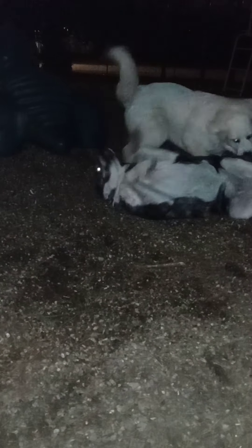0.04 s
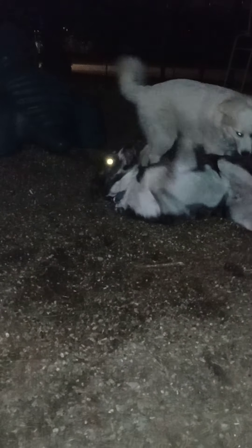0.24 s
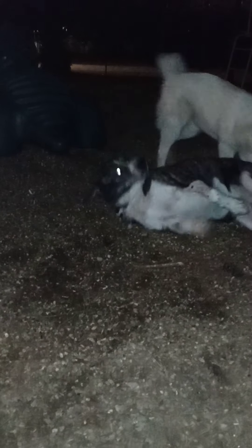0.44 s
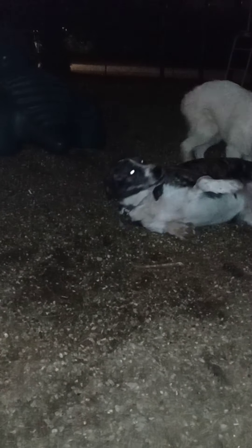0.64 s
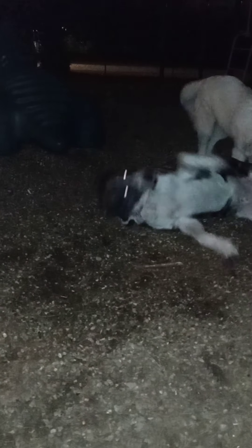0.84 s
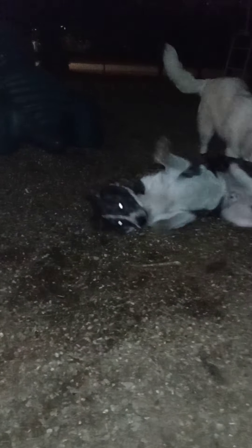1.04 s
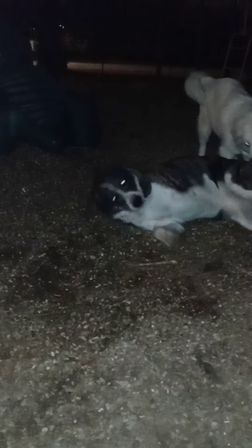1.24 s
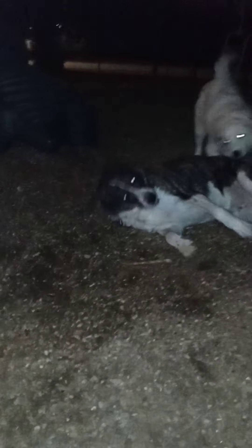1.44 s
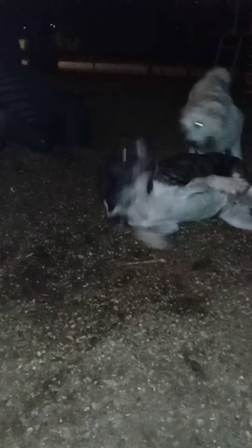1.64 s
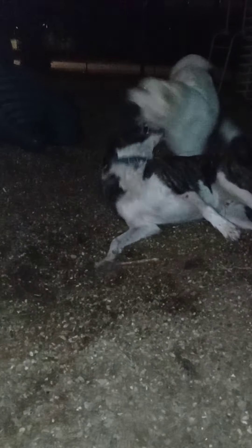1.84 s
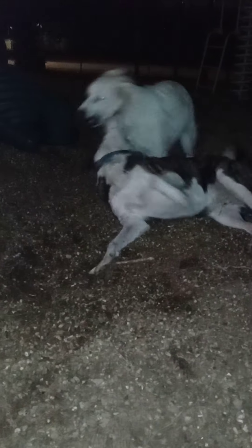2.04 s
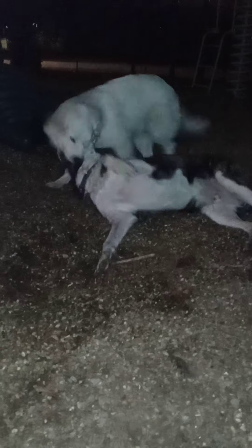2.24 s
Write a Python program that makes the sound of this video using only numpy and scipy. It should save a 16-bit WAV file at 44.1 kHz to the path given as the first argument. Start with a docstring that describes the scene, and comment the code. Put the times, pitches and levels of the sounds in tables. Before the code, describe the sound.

Gritty gravel scuffling from rolling dogs, heard outdoors at a short distance with little echo: bursts of scraping, one weighty body thump, light collar jingles, then a thin whistle from the nose and short rough huffs.

```python
"""Paws and backs scrape through loose gravel as two dogs wrestle in a yard at night: noise cut into tiny grains.
Bodies land with dull thuds of low noise, and metal on a collar clinks as a cluster of fading tones.
Near the end one dog gives short raspy huffs, made of chopped air ringing in its throat,
and a thin nose whistle, a wavering tone. A low rumble of filtered noise lies under it all."""
import sys
import numpy as np
from scipy import signal
from scipy.fft import rfft, irfft
from scipy.io import wavfile
from scipy.ndimage import uniform_filter1d

SR = 44100
rng = np.random.default_rng(int(sys.argv[2]) if len(sys.argv) > 2 else 0)


def wav_out(sig):
    """Save sig, one row per channel (or a flat mono array), as 16-bit PCM at SR to the path in sys.argv[1]."""
    wavfile.write(sys.argv[1], SR, np.round(np.clip(np.atleast_2d(sig).T, -1, 1) * 32767).astype(np.int16))


N = 99225
TIME = np.arange(N) / SR  # seconds

# Bright colour of fine grit, also used for the tick of a clink.
# Each row: frequency in Hz, relative level in dB.
FINE_COLOUR = [(1500, -50), (4000, -39), (6500, -1.5), (7400, -5.5), (8500, 3.5), (10000, -4.5),
               (11600, -18.5), (13000, -7.5), (16000, -16)]


def from_db(db):
    """Turn decibels into gain."""
    return 10 ** (np.asarray(db) / 20)


def rms_one(x):
    """Scale to an average strength (rms) of 1."""
    return x / np.sqrt(np.mean(x ** 2) + 1e-20)


def noise():
    """White noise with rms 1."""
    return rng.standard_normal(N)


def drift(rate_hz):
    """Smooth random wandering with rms 1; a higher rate wanders faster."""
    r = np.exp(-2 * np.pi * rate_hz / SR)
    wander = signal.lfilter([1], [1, -2 * r, r * r], rng.standard_normal(N + SR))
    return rms_one(wander[SR:])  # skip the filter's first second


def colour(x, points):
    """Filter that shapes the spectrum without ringing ahead; white noise keeps its level."""
    hz, db = np.transpose(points)
    size = 4096
    grid_hz = np.maximum(np.arange(size // 2 + 1) * SR / size, 1)
    gains = rms_one(from_db(np.interp(np.log(grid_hz), np.log(hz), db)))
    # folding the cepstrum moves the filter's energy to its start (minimum phase)
    cepstrum = irfft(np.log(gains))
    cepstrum[1:size // 2] *= 2
    cepstrum[size // 2 + 1:] = 0
    return signal.fftconvolve(x, irfft(np.exp(rfft(cepstrum))))[:N]


def swell(peak_s, rise_s, fall_s):
    """Envelope that climbs 20 dB in rise_s and drops 20 dB in fall_s."""
    before, after = (peak_s - TIME) / abs(rise_s), (TIME - peak_s) / abs(fall_s)
    return 10 ** -np.minimum(np.maximum(before, after), 10)


def rumble():
    """Distant low noise that surges a little, with faint air above it."""
    # Colour of the rumble and air. Each row: frequency in Hz, relative level in dB.
    rumble_colour = [(20, -44), (32, -17), (45, -23), (62, -4.5), (82, 2), (120, 0.5), (170, -3),
                     (230, -8.5), (310, -20), (420, -35), (700, -37), (2000, -46.5), (16000, -42)]
    level_db, surge_db, surge_hz, low_cut_hz = -49, 1.24, 6.8, 37
    low_cut = signal.butter(3, low_cut_hz, "high", fs=SR, output="sos")
    steady = signal.sosfilt(low_cut, colour(noise(), rumble_colour))
    return from_db(level_db + surge_db * drift(surge_hz)) * steady


def yard(x):
    """Short, faint scatter from the ground and the fence: a burst of fading noise as the echo."""
    echo_db, t60_s = -17.5, 0.11  # t60: time to fade by 60 dB
    t = TIME[:SR // 2]
    tail = rng.standard_normal(len(t)) * from_db(-60 * t / t60_s) * (t > 0.005)
    return from_db(echo_db) * signal.fftconvolve(x, tail / np.linalg.norm(tail))[:N]


def whistle():
    """A faint nose tone that wavers and mostly sinks in pitch, with a weak overtone."""
    # Path of the whistle. Each row: time in seconds, pitch in Hz, level in dB.
    path = [(1.7, 2984, -73), (1.766, 2943, -58), (1.805, 3006, -73), (1.835, 2990, -55.5),
            (1.879, 2983, -52.5), (1.894, 2840, -54), (1.94, 2780, -59), (1.995, 2580, -64),
            (2.03, 2530, -50), (2.06, 2460, -75)]
    waver_hz, overtone_db = 18.1, -18
    s, hz, db = np.transpose(path)
    pitch_hz = np.interp(TIME, s, hz) + waver_hz * drift(103)
    phase = 2 * np.pi * np.cumsum(pitch_hz) / SR
    tone = np.sin(phase) + from_db(overtone_db) * np.sin(4 * phase)  # fourth harmonic
    sounding = (TIME > s[0]) * (TIME < s[-1])
    return from_db(np.interp(TIME, s, db)) * sounding * np.sqrt(2) * tone


def throat(x, hz, width_hz):
    """Narrow resonance whose centre follows hz: shift down to zero, low-pass, shift back up."""
    turn = np.exp(2j * np.pi * np.cumsum(hz) / SR)
    low_pass = signal.butter(2, width_hz / 2, fs=SR, output="sos")
    return (signal.sosfilt(low_pass, x / turn) * turn).real


def huffs():
    """Slow, uneven flaps of the throat chop the air, which rings in the throat and hisses through the mouth."""
    # Each row: peak in seconds, rise and fall in seconds per 20 dB, level in dB, throat pitch in Hz,
    # throat width in Hz, throat glide in octaves per second, mouth hiss in dB against the throat.
    breaths = [(1.62, 0.12, 0.17, -57.5, 1710, 300, 7, 4.5), (1.745, 0.034, 0.12, -50, 1430, 199, 7.5, -8),
               (1.765, 0.1, 0.03, -48.5, 1870, 397, 4.5, -7), (1.789, 0.015, .015, -50, 2180, 80, 13.5, -9),
               (1.76, 0.055, 0.079, -60.5, 890, 150, -3.5, -16),
               (1.85, 0.064, 0.13, -56.5, 1190, 400, 2, 4.5),
               (1.928, 0.0049, 0.02, -42, 936, 60, -4.5, -21), (1.963, .025, 0.027, -42, 835, 198, 7, 5),
               (1.974, 0.023, 0.019, -35, 849, 89, -2.5, -17),
               (1.985, 0.0049, 0.012, -29.5, 900, 70, 2, -24),
               (2.04, 0.057, 0.052, -55.5, 862, 199, 2, 3.5),
               (2.08, 0.028, 0.046, -47.5, 860, 197, 1.5, -1),
               (2.149, 0.011, 0.043, -44, 960, 90, -0.5, -2), (2.17, 0.0098, 0.037, -41, 1220, 247, 1, -20),
               (2.182, 0.021, .03, -37, 941, 90, -2.5, -32), (2.2, 0.013, 0.02, -45.5, 982, 120, 4, -15)]
    # Colour of the mouth hiss. Each row: frequency in Hz, relative level in dB.
    mouth_colour = [(500, -32), (700, -15), (1200, -14), (1700, -9), (2100, -0.5), (2350, -8), (2700, 0),
                    (3300, -18), (5000, -12), (9000, -35), (16000, -62)]
    flutter_hz, flutter_jitter, flutter_depth = 85.36, 0.17, 0.35
    pulse_share = 0.18  # power share of sharp flaps; the rest is chopped noise
    cycles = np.cumsum(flutter_hz * np.exp(flutter_jitter * drift(40.35))) / SR
    gate = rms_one(1 + flutter_depth * np.cos(2 * np.pi * cycles))
    flaps = rms_one(np.diff(np.floor(cycles), prepend=0))  # one click per cycle
    air = np.sqrt(pulse_share) * flaps + np.sqrt(1 - pulse_share) * gate * noise()
    hiss = colour(gate * noise(), mouth_colour)
    out = np.zeros(N)
    for s, rise, fall, db, throat_hz, width_hz, glide, hiss_db in breaths:
        gliding_hz = throat_hz * 2 ** np.clip(glide * (TIME - s), -1, 1)
        voice = throat(air, gliding_hz, width_hz)
        # even out the strength over about 16 ms
        voice = voice / np.sqrt(uniform_filter1d(voice ** 2, size=700) + 1e-12)
        out += from_db(db) * swell(s, rise, fall) * (voice + from_db(hiss_db) * hiss)
    return out


def collar(count=3):
    """Each clink is a quick chatter of touches; fur damps the metal by a different amount each time."""
    # Each row: start in seconds, level in dB before the trim below, time to fade by 60 dB in seconds,
    # pitch in Hz around which the metal rings most readily.
    clinks = [(1.0097, -23.5, 0.019, 9100), (1.032, -24, 0.02, 8500), (1.0829, -26, 0.016, 8650),
              (1.336, -32.5, 0.042, 10200), (1.348, -28, 0.13, 7360), (1.3659, -27, .04, 7500),
              (1.388, -30, .02, 7850), (1.403, -40, 0.027, 11000), (1.4169, -27.5, 0.046, 8700),
              (1.4314, -14.5, 0.016, 7200), (1.4484, -19.5, 0.018, 7100), (1.466, -29.5, 0.033, 8500),
              (1.472, -27, .02, 7360), (1.477, -23.5, 0.018, 7600), (1.514, -25, 0.029, 9600),
              (1.6665, -15.5, 0.016, 7540), (1.68, -23, 0.018, 8100), (1.746, -37, 0.023, 8050)]
    # Tones the metal can ring with. Each row: frequency in Hz, relative level in dB.
    metal_tones = [(7240, -7), (7320, 0.5), (7780, -16), (8300, -5), (8850, -10), (9400, -3), (10000, 0.5),
                   (11500, -5), (12150, -10), (15720, 12)]
    width_octaves, trim_db, tick_db, low_cut_hz = 0.16, -1, -14.5, 4800
    chatter_s, chatter_loss_db = 0.0015, 7  # longest-typical gap, and loss from touch to touch
    hz, tone_db = np.transpose(metal_tones)
    out, t = np.zeros(N + SR), np.arange(SR // 10) / SR
    for s, db, t60, centre_hz in clinks:
        octaves_away = np.log2(hz / centre_hz)
        weights = from_db(tone_db) / (1 + (octaves_away / width_octaves) ** 2)
        weights = weights / np.linalg.norm(weights)
        for k in range(count):
            start = int((s + k * chatter_s * (1 + rng.uniform(-0.29, 0.067))) * SR)
            strengths = weights * from_db(rng.normal(0, 2.3, len(hz))) * rng.choice([-1, 1], len(hz))
            rings = strengths @ np.sin(2 * np.pi * hz[:, None] * t) * from_db(-60 * t / t60)
            out[start:start + len(t)] += from_db(db + trim_db - k * chatter_loss_db) * rings
    ticks = sum(from_db(db + tick_db) * swell(s, 1 / SR, 0.004) for s, db, _, _ in clinks)
    low_cut = signal.butter(4, low_cut_hz, "high", fs=SR, output="sos")
    return signal.sosfilt(low_cut, out[:N] + colour(noise() * ticks, FINE_COLOUR))


def thuds():
    """Bodies and paws land: bursts of low noise make dull knocks and the soft weight of a rolling body."""
    # Each row of knocks and rolls: peak in seconds, rise and fall in seconds per 20 dB, level in dB.
    knocks = [(.03, 0.14, 0.26, -64.5), (.222, 0.0044, 0.024, -54), (.33, 0.033, 0.037, -58),
              (0.419, 0.044, 0.045, -46.5), (.55, 0.055, 0.053, -51), (.78, 0.047, 0.038, -53.5),
              (0.899, 0.046, .1, -40.5), (0.922, 0.0011, 0.0093, -23.5), (.99, 0.027, 0.021, -56.5)]
    rolls = [(.555, 0.1, 0.17, -53), (0.93, 0.0047, 0.023, -40.5), (2.19, 0.056, 0.035, -56)]
    # Colours of a knock and of a roll. Each row: frequency in Hz, relative level in dB.
    knock_colour = [(150, -25), (300, -13), (500, -15), (680, -12), (900, 3.5), (1150, -3), (1500, 0.5),
                    (2500, -5.5), (5000, -54)]
    roll_colour = [(120, -55), (250, 2.5), (420, -1.5), (550, -6), (700, -7), (1200, -12)]
    knock_level = sum(from_db(db) * swell(s, rise, fall) for s, rise, fall, db in knocks)
    roll_level = sum(from_db(db) * swell(s, rise, fall) for s, rise, fall, db in rolls)
    return colour(noise() * knock_level, knock_colour) + colour(noise() * roll_level, roll_colour)


def contacts():
    """Power of a random stream of short stone contacts, each fading quickly; mean 1."""
    grains_per_s, spread_db, fade_s = 1900, 1, 0.00049
    sizes = from_db(spread_db * np.minimum(rng.exponential(1, N), 5))
    touches = sizes * (rng.random(N) < grains_per_s / SR)
    power = signal.lfilter([1], [1, -np.exp(-1 / (fade_s * SR))], touches ** 2 + 1e-18)
    return power / power.mean()


def crunch():
    """A dog's whole weight crunches into the gravel: one swell of grainy noise."""
    # Colour of the crunch. Each row: frequency in Hz, relative level in dB.
    crunch_colour = [(200, -45), (1200, -30), (2000, -12.5), (2600, -10.5), (3500, -4.5), (4700, 2),
                     (5400, 5), (6500, -22), (10000, -30), (16000, -41)]
    peak_s, rise_s, fall_s, level_db = 0.9164, 0.081, 0.039, -25.5
    level = from_db(level_db) * swell(peak_s, rise_s, fall_s)
    return colour(noise() * np.sqrt(contacts()) * level, crunch_colour)


def gravel():
    """Thousands of tiny stone contacts a second, swelling with each scrape; now and then one stone snaps."""
    # Each row: peak in seconds, rise and fall in seconds per 20 dB, level in dB,
    # coarse stones and fine grit in dB against that level, before the trims below.
    scrapes = [(0.092, 0.15, 0.14, -43, 7, -3), (0.245, 0.0017, 0.073, -26.5, -4.5, -1.5),
               (0.268, 0.015, 0.022, -27.5, -3, 5.5), (.309, 0.0022, 0.019, -37, 4, 9.5),
               (.36, 0.29, 0.14, -46, 4.5, 3.5), (.416, 0.042, 0.093, -36, 0.5, -2.5),
               (.48, 0.033, 0.28, -48.5, 5.5, 4), (.567, .006, 0.058, -38, 4, 3),
               (.62, 0.17, 0.12, -40, 1.5, -2.5), (0.684, 0.12, 0.15, -30, -2.5, -1),
               (.83, 0.15, 0.075, -37.5, 1.5, 0), (.89, 0.082, .04, -30, 9, -3.5),
               (0.915, 0.048, 0.064, -24, 2.5, -27), (1.018, 0.06, 0.12, -42, -1, -1),
               (1.098, 0.063, .06, -41, -5.5, 1.5), (1.138, 0.022, 0.02, -37, -3.5, 6.5),
               (1.17, 0.085, 0.039, -32.5, -6.5, -2.5), (1.32, 0.2, 0.14, -37.5, -5, 1.5),
               (1.479, 0.084, 0.046, -37.5, -10, 0.5), (1.575, 0.012, 0.13, -42.5, -5, -5),
               (1.66, 0.2, 0.14, -41, -1.5, 0), (1.68, .003, 0.024, -42, 4.5, 5),
               (1.78, 0.25, 0.9, -52.5, 2.5, 2), (1.919, 0.011, 0.038, -38, 3.5, 6.5),
               (1.969, 0.086, 0.21, -45.5, 4.5, 7.5), (2.076, 0.0067, 0.01, -36.5, 6.5, 6),
               (2.108, 0.04, 0.071, -49, 9, 8), (2.17, .04, 0.075, -50, 13.5, -2)]
    # Single stones snap together. Each row: time in seconds, level in dB, body of the stone in dB against it.
    stone_snaps = [(0.245, -38.5, -14), (0.266, -27, -16), (0.3075, -33, -12), (.409, -29, 1),
                   (.422, -38, -3), (.472, -36, -7), (.485, -29, -21), (0.5665, -30, -11),
                   (0.588, -22.5, -13), (0.721, -38, -16), (0.736, -38, -12), (0.9205, -29, -4),
                   (1.01, -29, -10), (1.038, -34, -25), (1.15, -25.5, -21), (1.222, -37, -16),
                   (1.278, -29, -17), (1.322, -22.5, -17.5), (1.43, -29, -16), (1.491, -34.5, -21),
                   (1.551, -37, -7), (1.576, -37, -9), (1.656, -30.5, -5), (1.6668, -26.5, -2),
                   (1.674, -26, -10)]
    # Colours of the middle and the coarse stones. Each row: frequency in Hz, relative level in dB.
    middle_colour = [(500, -50), (1500, -52.5), (2700, -17.5), (3500, -21), (4200, -14.5), (4850, -1),
                     (5600, -1), (5900, 3), (6400, 0.5), (6850, -10), (7500, -15.5), (8400, -3.5),
                     (10000, -16), (12000, -30), (16000, -30.5)]
    coarse_colour = [(60, -50), (300, -25), (650, -26.5), (860, -15), (1100, -24), (1470, -6),
                     (1720, -13.5), (2050, 1), (2350, -3.5), (2780, 0), (3500, -11.5), (4200, -6.5),
                     (5000, 0), (9000, -47), (16000, -67)]
    shifting_db = -58  # stones that never quite come to rest
    coarse_trim_db, fine_trim_db, snap_fine_db = -10, -4, -5
    snap_fall_s = 0.0019  # per 20 dB

    # the three sizes share one stream of contacts and each adds its own
    grains = (contacts() + np.array([contacts() for _ in range(3)])) / 2
    power = np.full((3, N), from_db(shifting_db) ** 2)
    for s, rise, fall, db, coarse_db, fine_db in scrapes:
        levels = from_db([[db], [db + coarse_db], [db + fine_db]])
        power += (levels * swell(s, rise, fall)) ** 2
    middle, coarse, fine = np.sqrt(power * grains)

    snaps, snap_bodies = np.zeros(N), np.zeros(N)
    for s, db, body_db in stone_snaps:
        shape = swell(s, 1 / SR, snap_fall_s)
        snaps += from_db(db) * shape
        snap_bodies += from_db(db + body_db) * shape

    coarse = from_db(coarse_trim_db) * coarse + snap_bodies
    fine = from_db(fine_trim_db) * fine + from_db(snap_fine_db) * snaps
    return (colour(noise() * (middle + snaps), middle_colour)
            + colour(noise() * coarse, coarse_colour)
            + colour(noise() * fine, FINE_COLOUR))


def scene():
    """The scuffle, its echo and the night's rumble."""
    dogs = gravel() + crunch() + thuds() + collar() + huffs() + whistle()
    return (dogs + yard(dogs) + rumble())[None]


def record(dry):
    """Cut the top steeply above 16100 Hz."""
    top_cut = signal.ellip(10, 0.1, 80, 16100, fs=SR, output="sos")
    return signal.sosfilt(top_cut, dry)


dry = scene()
out = record(dry)
wav_out(out)
```